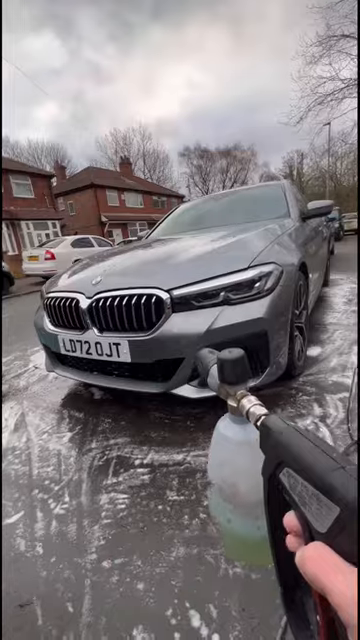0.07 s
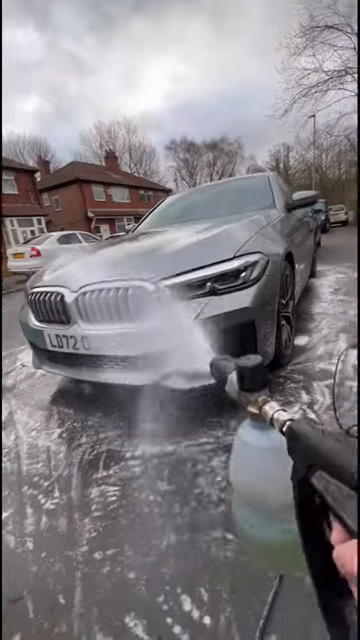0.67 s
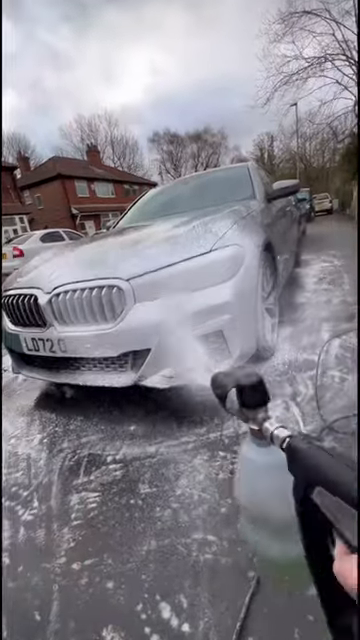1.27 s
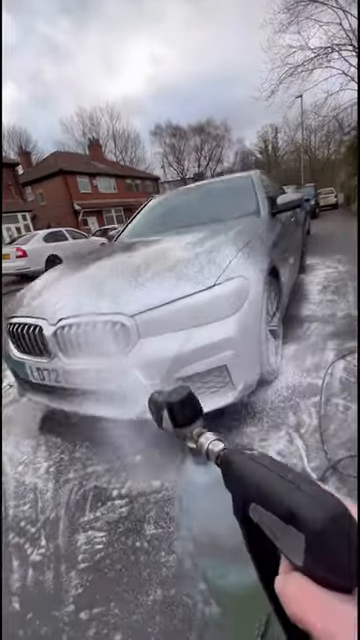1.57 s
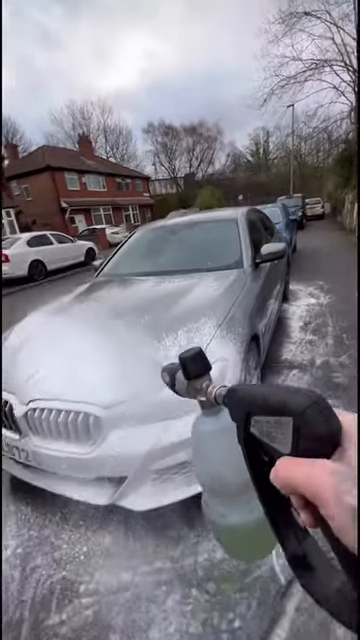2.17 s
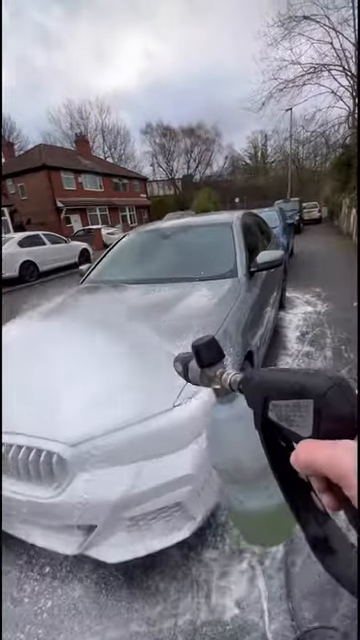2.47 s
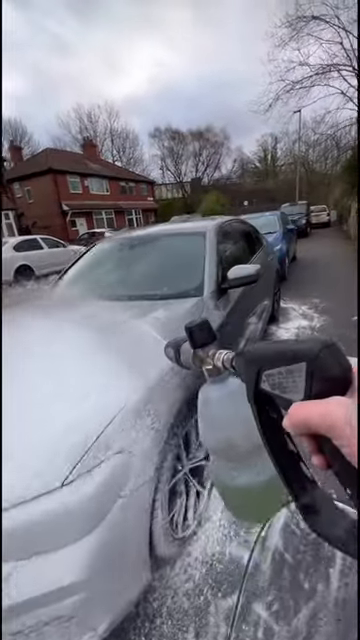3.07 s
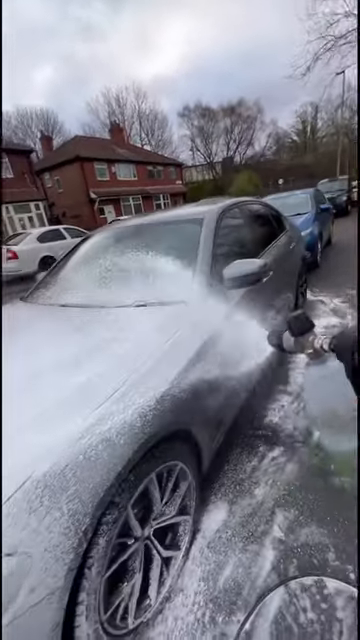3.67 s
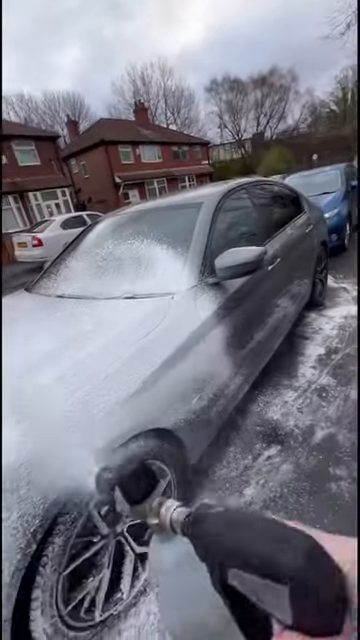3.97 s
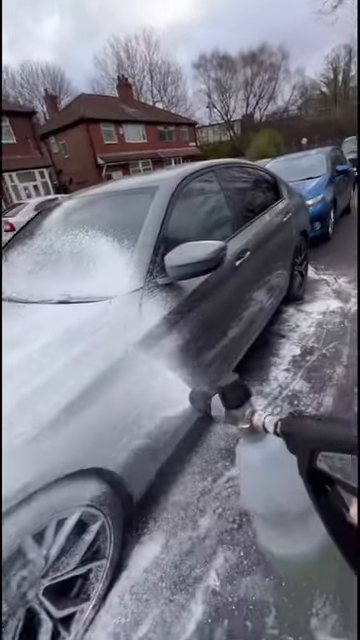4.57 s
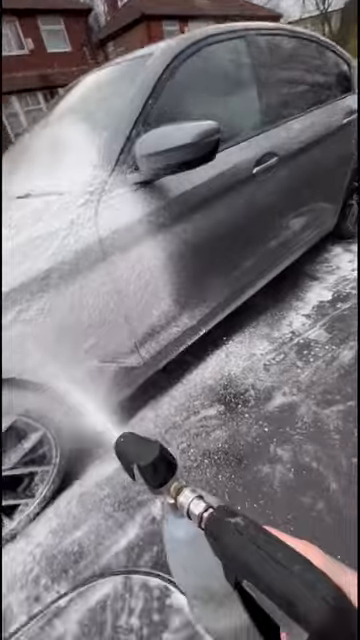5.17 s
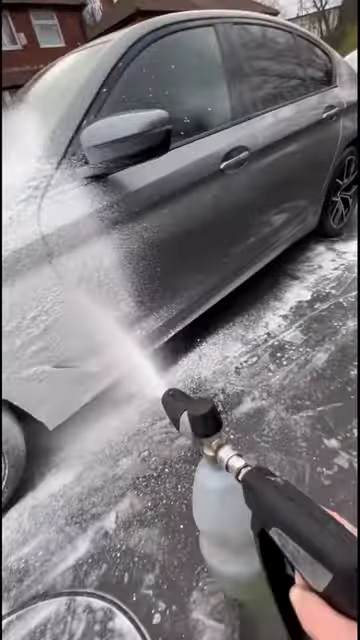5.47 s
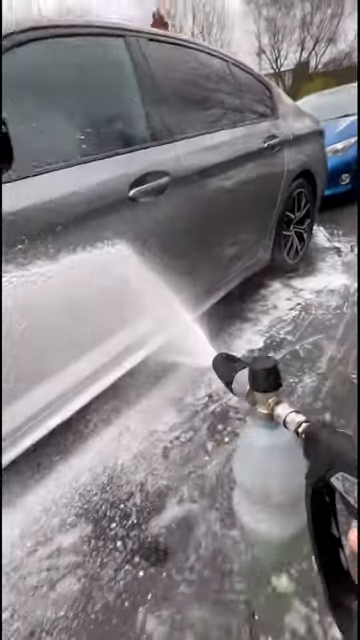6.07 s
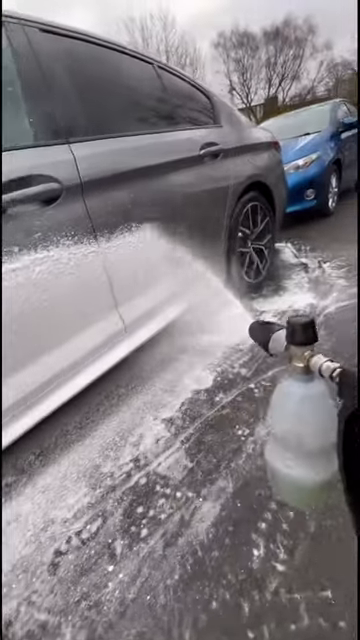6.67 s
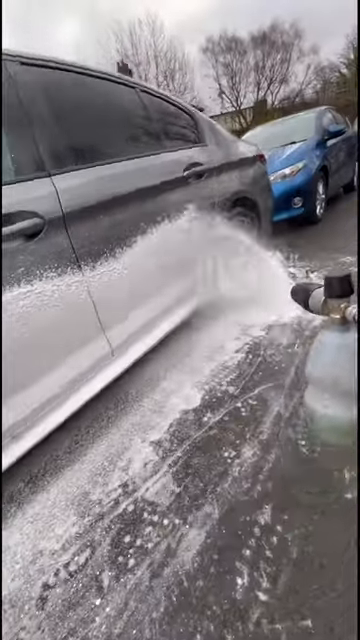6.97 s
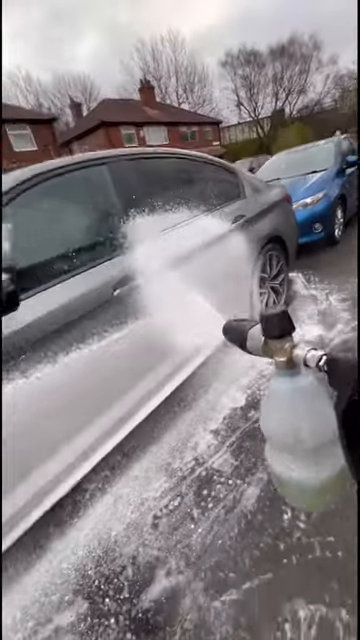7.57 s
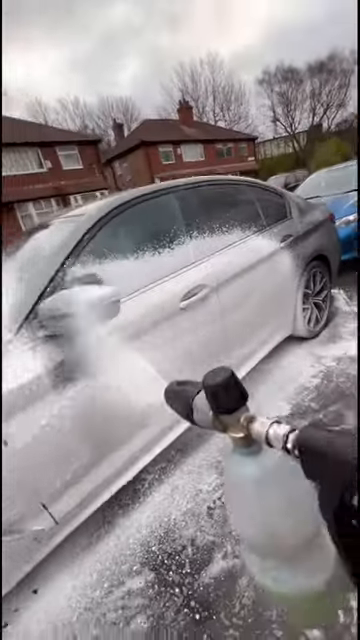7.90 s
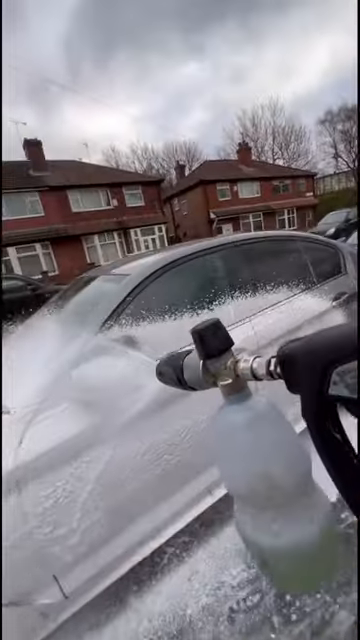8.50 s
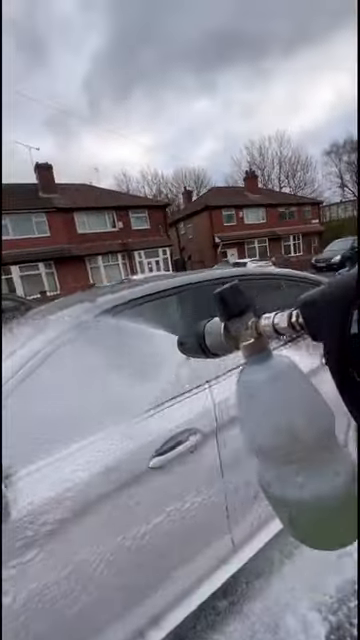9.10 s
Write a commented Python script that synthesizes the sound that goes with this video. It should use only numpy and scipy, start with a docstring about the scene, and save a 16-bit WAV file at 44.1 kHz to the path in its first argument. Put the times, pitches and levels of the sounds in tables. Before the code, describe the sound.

A knock and a short motor groan start a pressure washer, and a thin whistle climbs as its foam lance fills. From then on, a close, unbroken hiss of foam patters against a parked car, shifting in tone as the jet sweeps along. The pump hums beneath it, strongest at first, while hollow notes come and go and light outdoor wind brushes the microphone.

```python
"""A quiet street, light wind: a pressure washer's foam lance is swept over a parked car.
The trigger opens with a thump, the motor groans, and the pump runs up and hums through hose and lance.
The nozzle whistles upward as pressure builds. The fan of foam hisses out and drums on the panels,
brighter or duller as it is aimed, while hollow notes come and go. Heard in stereo."""
import sys
import numpy as np
from scipy import signal
from scipy.fft import rfft, irfft, next_fast_len
from scipy.io import wavfile

SR = 44100
rng = np.random.default_rng(int(sys.argv[2]) if len(sys.argv) > 2 else 0)


def generate_wav(signal):
    """Clip the signal to [-1, 1] and save it as 16-bit WAV at the path in sys.argv[1]."""
    frames = np.transpose(np.atleast_2d(signal))
    scaled = np.clip(frames, -1, 1) * 32767
    pcm = np.round(scaled).astype(np.int16)
    wavfile.write(sys.argv[1], SR, pcm)


N = 411894
TIME_S = np.arange(N) / SR
FFT_SIZE = next_fast_len(N, real=True)
BINS_HZ = np.maximum(np.arange(FFT_SIZE // 2 + 1) * SR / FFT_SIZE, 1)
OPEN_S, OPEN_RISE_S = 0.142, 0.013  # trigger

# All table levels are relative. Stereo width by frequency; between 2 and 3 kHz left and right carry the same
# sound. Each row: frequency in Hz, likeness 0-1, left lag in rad, left over right in dB.
STEREO_IMAGE = [(50, .02, 0, 2), (100, 1, 0, 0), (150, 1, 0.12, 0), (230, 1, 0.031, -3), (450, 1, 0.17, 3),
                (700, 0.8, 0.44, 1), (890, 0.82, 0.27, -2), (1390, 0.7, 0.5, -1.5), (2100, 1, 0, -0.5),
                (3060, 1, 0, 0), (3700, 1, 1.5, 1.5), (4260, 0.83, 0.86, 0), (5700, 0.3, 0.66, -4),
                (6650, 0.5, 0.011, -1.5), (8000, 0, 0.034, -0.5), (10000, 0.27, 1.2, -0.5),
                (11800, 0.63, .1, 0), (13000, .92, .05, 0), (14100, .62, 1.45, -1)]
# Noise colours. Each row: frequency in Hz, spectral density in dB.
STREET_SPECTRUM = [(25, -46), (50, -24), (80, -9), (140, -1), (200, 2), (700, -28), (1300, -10),
                   (3000, -29), (8500, -29), (15000, -38)]
WIND_SPECTRUM = [(15, -12), (40, -13), (80, 1.5), (130, -1.5), (200, -3), (400, -31.5)]
CHURN_SPECTRUM = [(25, -62), (50, -48), (85, -14), (140, -20), (210, -20.5), (290, -7.5), (380, 2),
                  (500, 0.5), (620, 3), (720, -7.5), (900, -22)]
RUSH_SPECTRUM = [(1880, -44), (3150, -6.5), (3450, 0), (3900, 0), (4300, -3), (4600, -9.5), (5980, -30),
                 (10100, -90)]
HISS_SPECTRUM = [(2710, -34), (4600, 0.5), (5600, 1), (6920, -6), (8600, -4), (11200, -18), (18900, -120)]
SIZZLE_SPECTRUM = [(5060, -23.5), (8600, -2), (10000, 3), (11000, -2), (14300, -24), (22000, -120)]
MIST_SPECTRUM = [(6470, -40), (11000, -11), (11800, 2), (13000, 2.5), (14300, 3), (15800, -0.5)]
DRUMMING_SPECTRUM = [(25, -50), (50, -64), (85, -31.5), (200, -20.5), (400, -7.5), (680, -6.5), (800, 0.5),
                     (1010, 4.5), (1170, -0.5), (1300, -9), (1690, -20), (2860, -70)]
SPLASH_SPECTRUM = [(760, -43), (1300, -1), (1700, -2), (2100, -2.5), (2600, 0), (2850, -18.5), (3200, -6.5),
                   (3600, -22), (7000, -80)]
SINGING_SPECTRUM = [(2000, -49), (2550, -3.5), (2780, 7), (2900, 5.5), (3020, 6.5), (3140, -12),
                    (3800, -45)]
# Gusts. Each row: centre in seconds, half length in seconds, rise over the breeze in dB.
WIND_GUSTS = [(.25, 0.15, 14), (1.75, 0.16, 7), (2.75, .12, 14), (3.7, 0.16, 11), (4.4, 0.28, 8)]
# Pressure knocks. Each row: start in seconds, level in dB, decay in seconds, brightness in dB.
VALVE_KNOCKS = [(0.15, -12, 0.0097, -4), (0.159, -9.5, 0.0038, -12), (0.217, -21, 0.0028, 12)]
# Lance resonances. Each row: frequency in Hz, width in Hz, level in dB.
LANCE_MODES = [(166, 24, -17), (379, 33, 12), (563, 36, 11), (1000, 210, -19)]
# Pump run-up. Each row: time in seconds, strokes per second.
PUMP_SPEED = [(0, 60), (.2, 67), (.25, 75), (.3, 82.5), (.35, 86.8), (.45, 89), (.55, 89.8), (.8, 89.9),
              (9.34, 89.85)]
# Hum at the lance. Each row: time in seconds, 5th pump harmonic in dB, motor tone in dB.
HUM_LEVELS = [(0.2, -19.5, -28), (0.48, -18.5, -22), (0.66, -23, -27), (2.36, -32.5, -36.5),
              (2.95, -38.5, -41), (3.71, -32.5, -41), (4.53, -36.5, -37.5), (5.47, -33, -41.5),
              (5.62, -33, -51), (6.84, -36.5, -56), (8.24, -34.5, -47), (9.29, -38, -53), (9.34, -38, -51)]
# Hose and lance as a filter on the pump. Each row: frequency in Hz, gain in dB.
HOSE_RESPONSE = [(90, -53), (180, -23), (270, -21), (360, -7.5), (450, 1.5), (490, 4), (540, -10),
                 (810, -19), (900, -34), (990, -12), (1080, -15), (1170, -17), (1350, -26)]
# Swells as the lance is carried along. Each row: time in seconds, 3rd, 7th and 8th harmonic in dB.
HARMONIC_SWELLS = [(0.25, -48, -27, -32), (0.37, -36, -24, -31), (1.54, -40.5, -33, -37.5),
                   (1.82, -45.5, -35.5, -31.5), (3.62, -55.5, -41.5, -45), (4.2, -52.5, -45, -41),
                   (4.58, -47.5, -36, -51), (5.82, -47.5, -40.5, -37.5), (6.98, -51.5, -40, -49),
                   (7.21, -47.5, -39.5, -48), (7.9, -41, -45, -38), (8.88, -43.5, -38, -45),
                   (9.34, -47, -39.5, -62)]
# The jet as aimed. Each row: time in seconds, rush, hiss and fine mist in dB.
JET_LEVELS = [(0.25, -28, -25, -39), (0.27, -25.5, -26.5, -29.5), (0.93, -32.5, -33, -33.5),
              (1.11, -32, -33.5, -38), (1.29, -35.5, -35, -35), (1.46, -34.5, -35.5, -43),
              (1.64, -36, -33, -39), (3.46, -34.5, -34.5, -39.5), (3.64, -35.5, -37.5, -40),
              (3.94, -34.5, -30.5, -31.5), (4.12, -40, -33.5, -28.5), (4.65, -33.5, -31.5, -34.5),
              (4.96, -35, -31, -31), (6.38, -34.5, -35, -32), (7.11, -35.5, -39, -40.5),
              (7.49, -33, -37, -39), (8.1, -33.5, -30, -34.5), (9.34, -34, -31.5, -31)]
# Echoes off near panel, far panel and wet road. Each row: first delay, last delay and sway in ms, gain.
ECHO_PATHS = [(1.0, 0.414, 0.096, 0.23), (2.05, 1.9, 0.213, 0.27), (4.05, 3.9, 0.298, 0.3)]
# Foam landing on the car. Each row: time in seconds, level in dB.
IMPACT_LEVELS = [(0.23, -14.5), (0.25, -19), (0.51, -20), (0.56, -22.5), (1.29, -29.5), (2.18, -30.5),
                 (2.31, -31), (3.66, -32), (3.93, -30), (7.38, -32.5), (7.92, -26.5), (9.34, -29)]
# Nozzle whistle. Each row: time in seconds, low and high tone in Hz, level in dB.
WHISTLE_GLIDE = [(.19, 6000, 10000, -60), (.215, 6700, 10800, -31), (.245, 7500, 11600, -26),
                 (.275, 8200, 12150, -28), (.33, 8700, 12950, -26.5), (.4, 9100, 13200, -42),
                 (.5, 9300, 13400, -90)]
# Hollow notes. Each row: start and end in seconds, pitch and width in Hz, level in dB.
HOLLOW_NOTES = [(.8, 1.6, 9020, 50, -42), (1.5, 4.0, 9030, 55, -45), (1.1, 2.8, 5500, 350, -39),
                (3.8, 4.6, 2860, 110, -37), (4.5, 5.2, 2940, 65, -35), (5.05, 5.95, 2920, 75, -34),
                (6.1, 7.3, 2980, 70, -38), (5.7, 7.1, 3760, 100, -37), (6.9, 7.8, 3560, 100, -38),
                (6.8, 7.8, 3950, 110, -38.5), (5.3, 6.3, 10200, 520, -34), (6.2, 7.9, 9900, 560, -36),
                (8.0, 9.3, 5600, 420, -35.5), (7.8, 9.3, 3900, 260, -39.5), (7.6, 9.3, 2860, 110, -37.5)]


def from_db(db):
    """Decibels to gain."""
    return np.exp(np.asarray(db) * (np.log(10) / 20))


def rms_one(x):
    """Scale to rms 1."""
    return x / np.sqrt(np.mean(x ** 2) + 1e-20)


def in_time(rows):
    """Each column of a curve at every sample."""
    times_s, *columns = np.transpose(rows)
    return [np.interp(TIME_S, times_s, column) for column in columns]


def in_frequency(rows):
    """Each column of a spectrum at every bin."""
    hz, *columns = np.transpose(rows)
    return [np.interp(np.log(BINS_HZ), np.log(hz), column) for column in columns]


def drift(rate_hz):
    """Smooth random curve of spread 1."""
    knots = rng.standard_normal(1 << 14)
    return np.interp(TIME_S * rate_hz, np.arange(len(knots)), knots) / np.sqrt(2 / 3)


def follow(level_db, share, mean_db=0):
    """A level that takes a share of another's swing about its mean."""
    return mean_db + share * (level_db - level_db.mean())


def resonate(x, hz, width_hz):
    """Two-pole resonance, peak gain 1."""
    r = np.exp(-np.pi * width_hz / SR)
    poles = [1, -2 * r * np.cos(2 * np.pi * hz / SR), r * r]
    return signal.lfilter(np.array([1, 0, -1]) * (1 - r * r) / 2, poles, x)


def low_cut(x, hz):
    """Second-order high-pass."""
    return signal.sosfilt(signal.butter(2, hz, "high", fs=SR, output="sos"), x)


def stereo_image():
    """Left and right gains for the shared and opposed parts of a diffuse sound."""
    alike, lag_rad, balance_db = in_frequency(STEREO_IMAGE)
    alike, sides = np.clip(alike, 0, 1), np.array([[1], [-1]])
    gain = from_db(sides * balance_db / 2) * np.exp(-.5j * sides * lag_rad)
    return gain * np.sqrt(1 + alike), gain * np.sqrt(1 - alike) * sides


def noise(spectrum, image):
    """Coloured stereo noise, cut below the first row; mid rms 1."""
    shared, opposed = rng.standard_normal((2, 2 * len(BINS_HZ))).view(complex)
    colour = from_db(in_frequency(spectrum)[0]) * (BINS_HZ > spectrum[0][0])
    x = irfft((image[0] * shared + image[1] * opposed) * colour, FFT_SIZE)[:, :N]
    return x / np.std(x.mean(axis=0))


def breathy(hz, width_hz):
    """Narrow noise band, rms 1, around a per-sample pitch."""
    steps = np.arange(len(hz)) * 2 * width_hz / SR
    knots = rng.standard_normal(2 * (int(steps[-1]) + 2)).view(complex)
    envelope = np.interp(steps, np.arange(len(knots)), knots)
    return np.real(envelope * np.exp(2j * np.pi * np.cumsum(hz) / SR)) / np.sqrt(2 / 3)


def street(image, level_db=-59):
    """Steady, mostly low background of the still street."""
    return from_db(level_db) * noise(STREET_SPECTRUM, image)


def wind(breeze_db=-69.5, lumps_db=5):
    """Gusty rumble on the microphone, independent left and right."""
    apart = np.array([[1], [0]]), np.array([[0], [1]])
    gusts_db = [db * np.exp(-.5 * ((TIME_S - at_s) / half_s) ** 2) for at_s, half_s, db in WIND_GUSTS]
    level_db = breeze_db + np.max(gusts_db, axis=0) + lumps_db * drift(5)
    return from_db(level_db) * noise(WIND_SPECTRUM, apart)


def valve_knocks(crack_db=-26.5):
    """The valve opens and air spits out: short turbulent bursts ring the lance."""
    out, early_s = np.zeros(N), TIME_S[:SR // 2]
    for start_s, db, decay_s, bright_db in VALVE_KNOCKS:
        burst = low_cut(rng.standard_normal(len(early_s)), hz=130)
        ring = sum(from_db(mode_db) * resonate(burst, hz, width) for hz, width, mode_db in LANCE_MODES)
        crack = from_db(crack_db + bright_db) * rms_one(resonate(burst, hz=1100, width_hz=1400))
        age = np.maximum(early_s - start_s, 0) / decay_s
        out[:len(early_s)] += from_db(db) * (rms_one(ring) + crack) * age * np.exp(1 - age)
    return out


def motor_groan(start_s=.15, length_s=.12, hz=156.4, peak_db=-32):
    """A low tone swells and dies as the motor takes the load."""
    age = np.clip((TIME_S - start_s) / length_s, 0, 1)
    return from_db(peak_db) * np.sqrt(4 * age * (1 - age)) * np.sin(2 * np.pi * hz * TIME_S)


def pump_hum(stroke_rad, fifth_db, motor_db, body_db, start_s=.155, rise_s=.04):
    """Piston harmonics, throbbing with the hose's pressure surge, plus the geared motor's tone."""
    stroke_rad = stroke_rad + .024 * drift(25)
    stroke_hz, = in_time(PUMP_SPEED)
    harmonics = []
    for k in (2, 4, 5, 6, 9, 10, 11, 12, 13):
        hose_db = np.interp(k * stroke_hz, *np.transpose(HOSE_RESPONSE))
        wander_db = .27 + 1.4 * drift(1.297)
        harmonics.append((k, (fifth_db if k == 5 else body_db) + hose_db + wander_db))
    harmonics += zip((3, 7, 8), np.add(in_time(HARMONIC_SWELLS), .5))
    surge_rad, motor_rad = .2265 * stroke_rad, 4.545 * stroke_rad
    swing_rad, throb = .17 * np.sin(surge_rad), 1 + .16 * np.cos(surge_rad)
    pistons = sum(from_db(db) * np.sin(k * stroke_rad + rng.uniform(0, 2 * np.pi) - swing_rad)
                  for k, db in harmonics)
    stroke_load = 1 + .36 * np.cos(stroke_rad)
    motor = from_db(motor_db + .5) * np.sin(motor_rad) * stroke_load
    fade_in = np.clip((TIME_S - start_s) / rise_s, 0, 1)
    return fade_in * np.sqrt(2) * (pistons * throb + motor)


def widen(x, side_db=-9, above_hz=780):
    """Only the higher frequencies are out of step between left and right."""
    side = irfft(1j * rfft(x, FFT_SIZE) / np.sqrt(1 + (above_hz / BINS_HZ) ** 9), FFT_SIZE)[:N]
    return x + from_db(side_db) * side * np.array([[1], [-1]])


def water_churn(stroke_rad, body_db, image, air_db=2, air_clears_s=.47):
    """Water churns in the lance at each stroke, harder until trapped air clears."""
    boost_db = air_db * np.exp(-np.maximum(TIME_S - OPEN_S, 0) / air_clears_s)
    level_db = follow(body_db, share=.79, mean_db=-38) + boost_db
    return from_db(level_db) * noise(CHURN_SPECTRUM, image) * (1 + .16 * np.cos(stroke_rad))


def nozzle_jet(fill_db, image, wobble_db=.68):
    """Four bands of jet turbulence; the aim sets their balance."""
    rush_db, hiss_db, mist_db = in_time(JET_LEVELS) + fill_db
    sizzle_db = follow(hiss_db, share=.34, mean_db=-32.5) + follow(mist_db, share=.47)
    bands = [(rush_db, RUSH_SPECTRUM), (hiss_db + .5, HISS_SPECTRUM),
             (sizzle_db, SIZZLE_SPECTRUM), (mist_db + 1.5, MIST_SPECTRUM)]
    return sum(from_db(db + wobble_db * drift(12)) * noise(spectrum, image) for db, spectrum in bands)


def echoes(x, sway_hz=2.2):
    """Bodywork and road return the hiss; the paths shorten and sway, sweeping soft combs through it."""
    out = x
    for first_ms, last_ms, sway_ms, gain in ECHO_PATHS:
        delay_ms = np.linspace(first_ms, last_ms, N) + sway_ms * drift(sway_hz)
        out = out + gain * np.array([np.interp(TIME_S - delay_ms / 1000, TIME_S, side) for side in x])
    return out


def foam_impact(stroke_rad, fill_db, image):
    """Foam hits the panels: pulsing drumming, splash and a singing band near 2.9 kHz."""
    impact_db = in_time(IMPACT_LEVELS)[0] + fill_db
    pulse = 1 + .065 * np.cos(stroke_rad)
    drumming = from_db(impact_db - 1.5) * noise(DRUMMING_SPECTRUM, image) * pulse
    splash = from_db(follow(impact_db, share=.9, mean_db=-33)) * noise(SPLASH_SPECTRUM, image)
    singing_db = follow(impact_db, share=.72, mean_db=-35.5) + 1.5 * drift(12)
    return drumming, splash, from_db(singing_db) * noise(SINGING_SPECTRUM, image)


def spatter(blobs_per_s=260, size_db=-13, spread_db=1.5, decay_s=.00057):
    """Gain spikes: single blobs of foam burst out of the hiss."""
    born = rng.random(N) < blobs_per_s / SR
    sizes = from_db(size_db + spread_db * np.minimum(rng.exponential(1, N), 3))
    return rms_one(1 + signal.lfilter([1], [1, -np.exp(-1 / (decay_s * SR))], born * sizes + 1e-18))


def foam_spray(stroke_rad, image, fill_start_s=.18, fill_s=.041, unfilled_db=-11.5):
    """Jet and impact, weak until the lance fills; the uneven mix of air and soap makes them flutter."""
    fill_db = unfilled_db * (1 - np.clip((TIME_S - fill_start_s) / fill_s, 0, 1))
    drumming, splash, singing = foam_impact(stroke_rad, fill_db, image)
    jet = from_db(-.85) * nozzle_jet(fill_db, image)
    flutter = from_db(.48 * drift(110) + .45 * drift(22))
    return singing + flutter * (drumming + (splash + echoes(jet)) * spatter())


def nozzle_whistle(splutter_db=2.5):
    """Two spluttering tones climb with the jet's speed."""
    low_hz, high_hz, db = in_time(WHISTLE_GLIDE)
    return sum(from_db(db + tone_db + splutter_db * drift(45)) * breathy(hz, width_hz=340)
               for hz, tone_db in [(low_hz, -5.5), (high_hz, -6)])


def hollow_notes(trim_db=-2):
    """Each note swells, wavers and sputters as the jet passes through its angle."""
    out = np.zeros(N)
    waver, sputter = .4 * drift(14), from_db(1.6 * drift(15))
    for start_s, end_s, hz, width_hz, db in HOLLOW_NOTES:
        on = (TIME_S > start_s) & (TIME_S < end_s)
        swell = np.sqrt(np.sin(np.pi * (TIME_S[on] - start_s) / (end_s - start_s)))
        out[on] += from_db(db + trim_db) * swell * breathy(hz + width_hz * waver[on], width_hz)
    return out * sputter


def scene():
    """The trigger lets pump and spray loose over the still street."""
    image = stereo_image()
    stroke_rad = 2 * np.pi * np.cumsum(in_time(PUMP_SPEED)[0]) / SR
    fifth_db, motor_db = in_time(HUM_LEVELS)
    body_db = fifth_db + follow(motor_db - fifth_db, share=.23)
    hum = widen(pump_hum(stroke_rad, fifth_db, motor_db, body_db))
    churn = water_churn(stroke_rad, body_db, image)
    washer = hum + churn + foam_spray(stroke_rad, image) + nozzle_whistle() + hollow_notes()
    trigger = np.clip((TIME_S - OPEN_S) / OPEN_RISE_S, 0, 1)
    return trigger * washer + valve_knocks() + motor_groan() + street(image) + wind()


def record(dry, low_cut_hz=65, high_cut_hz=15750):
    """Rounded peaks, bass roll-off, steep top cut."""
    rounded = 1.51 * np.tanh(dry / 1.475)
    top_cut = signal.ellip(12, .1, 80, high_cut_hz, fs=SR, output="sos")
    return signal.sosfilt(top_cut, low_cut(rounded, low_cut_hz))


dry = scene()
out = record(dry)
generate_wav(out)
```